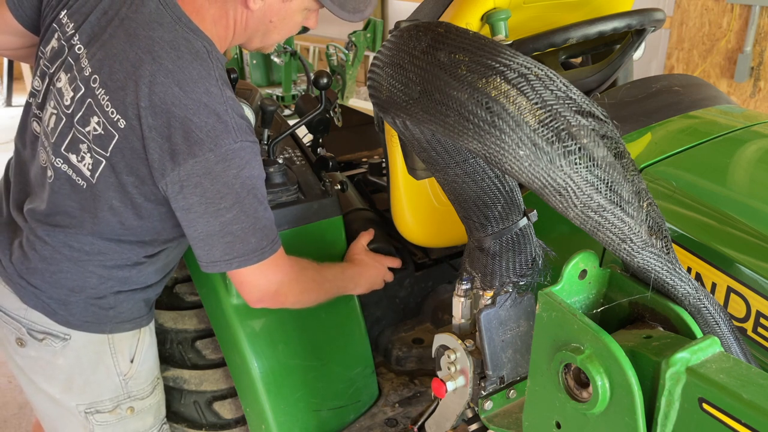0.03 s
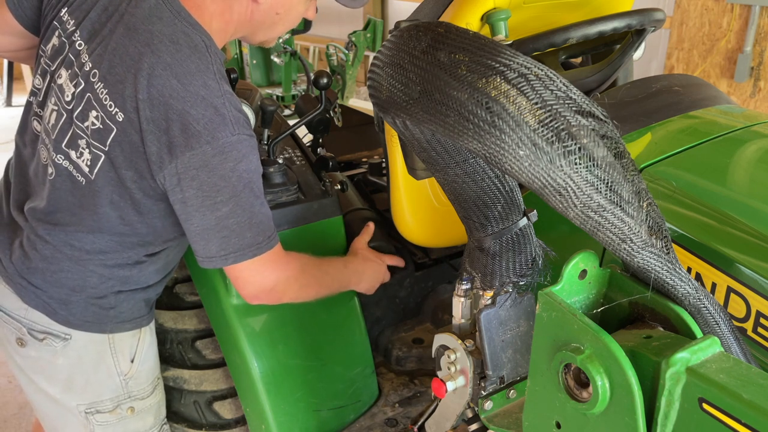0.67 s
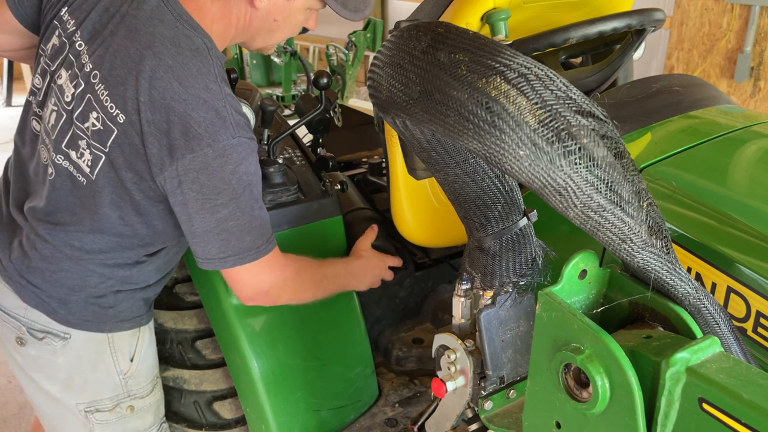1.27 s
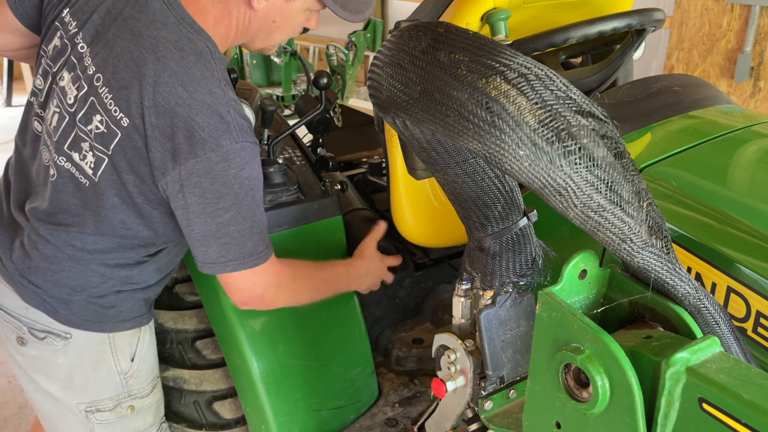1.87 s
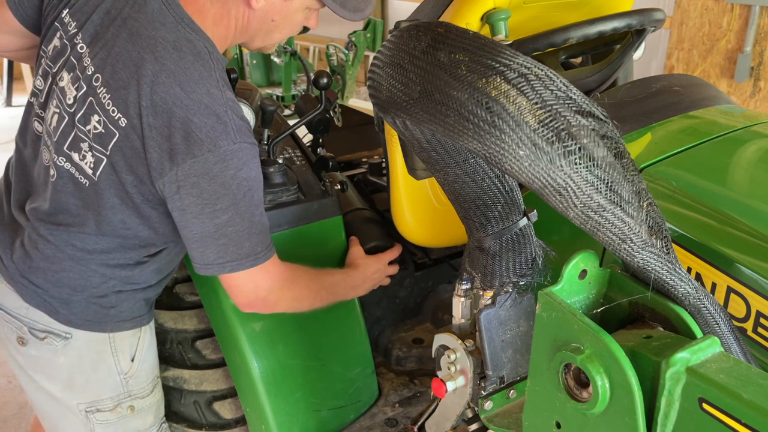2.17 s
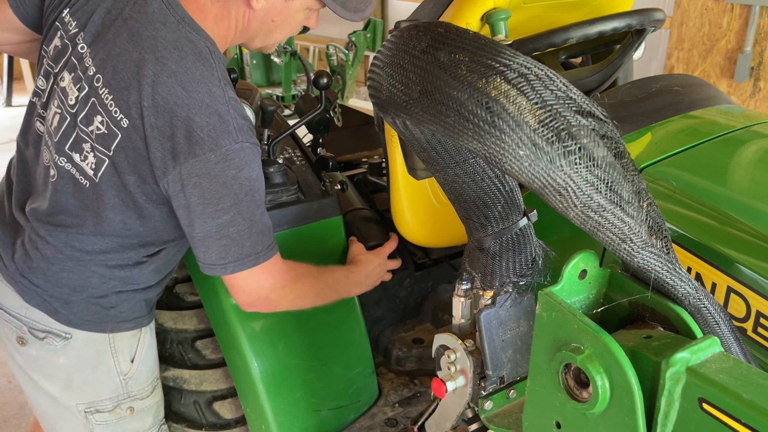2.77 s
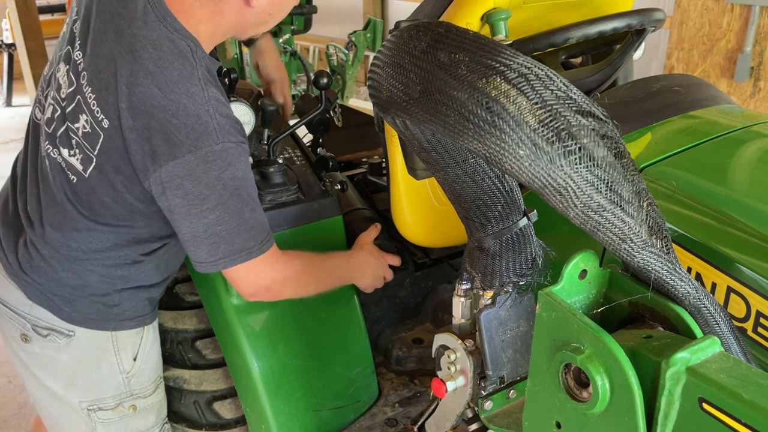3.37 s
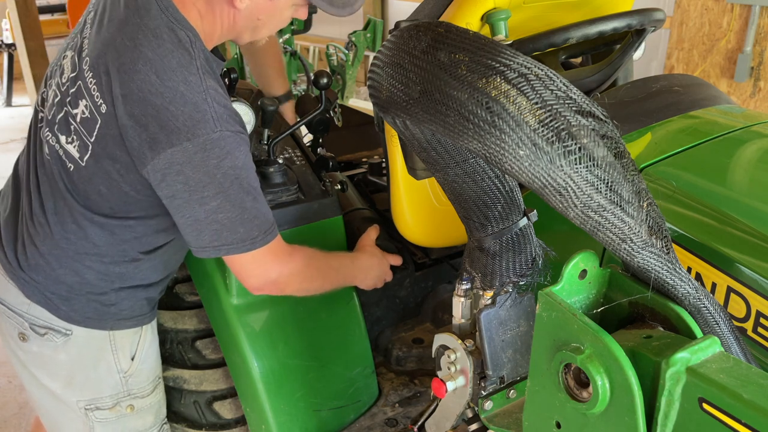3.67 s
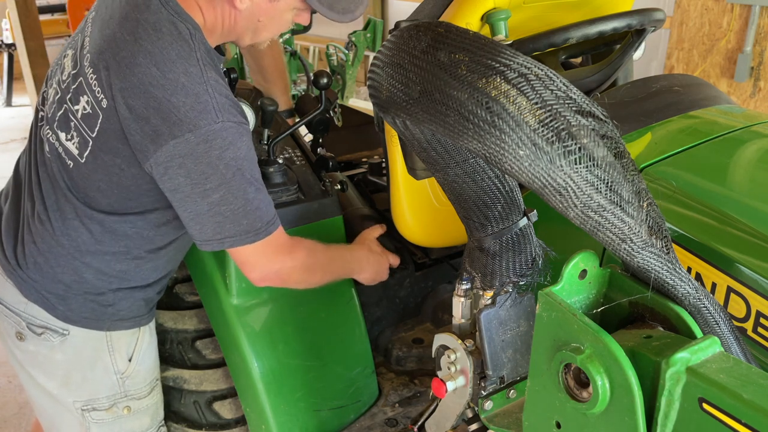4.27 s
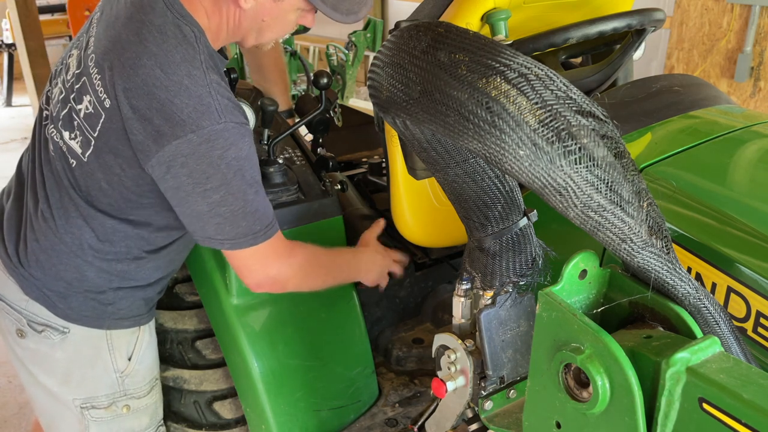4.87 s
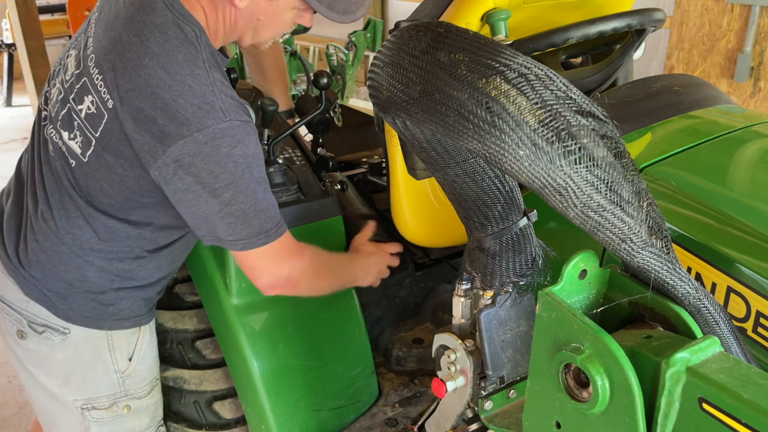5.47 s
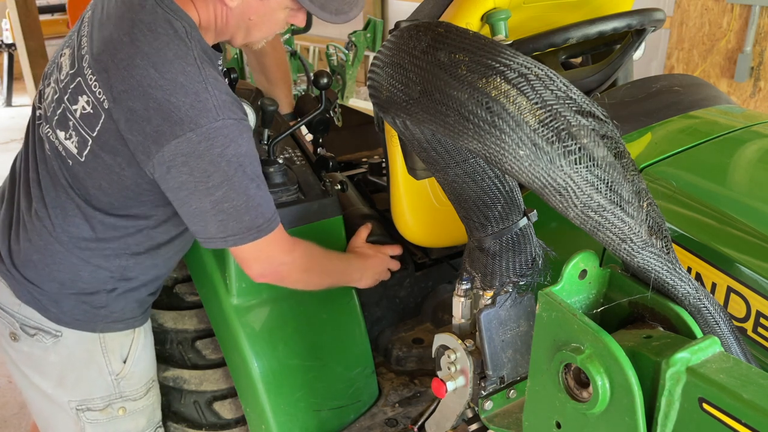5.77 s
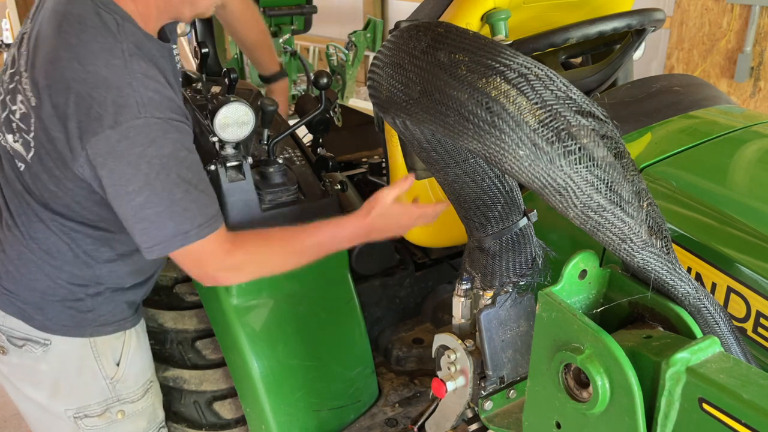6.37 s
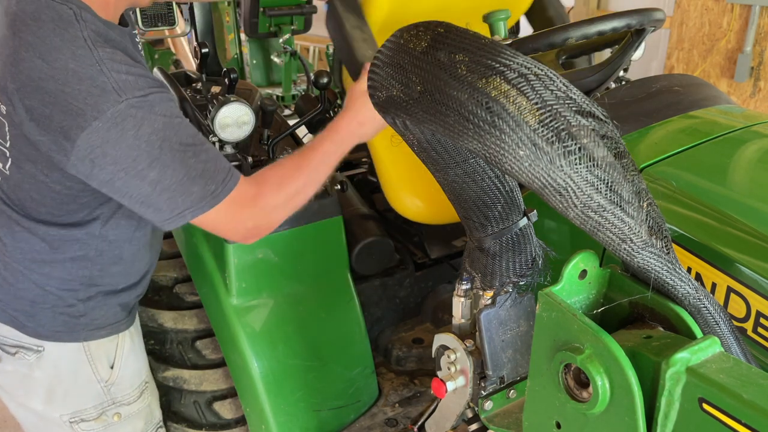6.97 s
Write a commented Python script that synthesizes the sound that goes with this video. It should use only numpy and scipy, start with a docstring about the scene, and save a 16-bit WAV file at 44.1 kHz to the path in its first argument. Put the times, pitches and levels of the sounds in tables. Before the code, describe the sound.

Hands grip and turn a plastic tube on a tractor, with hollow knocks, light rubbing and two sharp snaps midway.

```python
"""A plastic tool tube, mounted on a compact tractor, is gripped and turned by hand in an open shed.
Impacts excite its damped modes as hollow knocks; stick-slip friction makes it rub and rasp.
Midway it snaps loudly, twice. Each blow shakes the tractor's frame, and the shed reverberates.
Air now and then buffets the microphone, over a faint hiss."""
import sys
import numpy as np
from scipy import signal
from scipy.fft import rfft, irfft, next_fast_len
from scipy.io import wavfile
from scipy.ndimage import uniform_filter1d

SR = 44100
rng = np.random.default_rng(int(sys.argv[2]) if len(sys.argv) > 2 else 0)


def to_wav(sig):
    """Store sig (one row per channel, or 1-D mono) as 16-bit WAV at the path in sys.argv[1].

    Samples outside -1..1 are clipped; the rate is SR.
    """
    pcm = np.clip(np.atleast_2d(sig), -1, 1) * 32767
    pcm = np.round(pcm).astype(np.int16)
    wavfile.write(sys.argv[1], SR, pcm.T)  # frames by channels


N = 310239
TIME = np.arange(N) / SR


def from_db(db):
    """Amplitude ratio of a level in decibels."""
    return 10 ** (np.asarray(db) / 20)


def rms(x):
    """Root-mean-square amplitude."""
    return np.sqrt(np.mean(x ** 2) + 1e-20)


def at_hz(rows, hz):
    """Interpolation of a two-column table on a logarithmic frequency axis."""
    freqs, values = np.transpose(rows)
    return np.interp(np.log(np.maximum(hz, 1)), np.log(freqs), values)


def band(x, low, high, order):
    """Causal Butterworth band-pass filtering."""
    return signal.sosfilt(signal.butter(order, [low, high], "band", fs=SR, output="sos"), x)


def add(track, start_s, sound):
    """Linear superposition of a sound on a track."""
    start = max(int(start_s * SR), 0)
    track[:, start:start + sound.shape[1]] += sound[:, :max(N - start, 0)]


# Left-right coherence of the diffuse field: f/Hz, coherence/1
COHERENCE = [(60, .96), (130, .975), (260, .965), (550, .45), (1200, .33), (2500, .38), (5000, .28),
             (10000, .2)]

def diffuse_pair(spectra, hz):
    """Spatial coherence: two independent spectra mix to left and right, most alike at long wavelengths."""
    coherence = at_hz(COHERENCE, hz)
    mid = np.sqrt(1 + coherence) * spectra[0]
    side = np.sqrt(1 - coherence) * spectra[1]
    return np.array([mid + side, mid - side]) / np.sqrt(2)


def coloured_noise(spectrum):
    """Spectral shaping of white noise gives diffuse stereo noise of unit rms."""
    hz = np.fft.rfftfreq(N, 1 / SR)
    white = diffuse_pair(rfft(rng.standard_normal((2, N))), hz)
    noise = irfft(white * from_db(at_hz(spectrum, hz)), N)
    return noise / rms(noise)


# Spectral density of the background hiss: f/Hz, relative level/dB
HISS_SPECTRUM = [(30, -28), (60, -9.5), (102, 1), (200, -14.5), (310, -17), (480, -21), (1000, -26.5),
                 (2400, -28), (4800, -33), (5400, -31), (5570, -26), (5800, -30), (7200, -35.5),
                 (8700, -29.5), (9700, -34.5), (10200, -101)]

def hiss(level_db=-46):
    """Stationary broadband noise forms a faint floor."""
    return from_db(level_db) * coloured_noise(HISS_SPECTRUM)


# Strength of the air against the microphone: t/s, relative level/dB
GUSTS = [(0, -59), (1.8, -62), (2.1, -45), (2.5, -55.5), (3.28, -47.5), (3.58, -29), (3.92, -40.5),
         (4.19, -42), (4.25, -28), (4.36, -42), (4.97, -35.5), (5.2, -47), (5.69, -49.5), (5.75, -33),
         (6.27, -29.5), (6.5, -43.5), (6.91, -55), (7.0, -25)]
# Spectral density of the rumble of air and of frame: f/Hz, relative level/dB
RUMBLE_SPECTRUM = [(20, -11.5), (35, -4.5), (58, 5), (80, 2.5), (110, -10), (170, -29), (400, -63)]

def buffeting(flutter_db=3, eddies_per_s=19, side_db=5.5, trim_db=0.5):
    """Turbulent pressure on the microphone makes a low rumble whose level flutters at random."""
    rumble = coloured_noise(RUMBLE_SPECTRUM)
    mid = rumble.mean(axis=0)
    rumble = mid + from_db(side_db) * (rumble - mid)
    running_power = uniform_filter1d(np.mean(rumble ** 2, axis=0), size=2400)
    eddies = rng.standard_normal(400)
    flutter = np.interp(TIME * eddies_per_s, np.arange(len(eddies)), eddies)
    gust_db = np.interp(TIME, *np.transpose(GUSTS))
    return rumble / np.sqrt(running_power) * from_db(gust_db + flutter_db * flutter + trim_db)


# Normal modes of the tube on its mount: f/Hz, relative level/dB, T60/s
TUBE_MODES = [(107, -5, 0.28), (122.5, -10, 0.334), (154.1, -4, 0.34), (197.2, -1, 0.077),
              (218, -6.5, 0.16), (257.4, -9.5, 0.11), (299.8, -6, 0.16), (326, -15.5, 0.11),
              (390, -3, 0.089), (457.5, -11.5, 0.153), (536, -6.5, 0.082), (595, -10.5, 0.111),
              (666, -10.5, 0.038), (806, -2, 0.024), (901, -14.5, 0.13), (1000, -5.5, 0.024),
              (1110, -3.5, 0.028), (1277, 14, 0.013), (1503, -5, 0.067), (1662, -10, 0.072),
              (2220, -30, .04), (2593, -14.5, 0.054), (2806, -6, 0.039)]

def tube_response(flex_hz, swell_s, ring_db, flex_db, wall_db, wall_t60, snap_db, size):
    """Impulse response: the wall flexes and springs back, its dense modes crack, the hollow rings on."""
    t = TIME[:size]
    hz, level_db, t60 = np.transpose(TUBE_MODES)[:, :, None]
    # modes near the flexing frequency respond most; the place of contact sets the rest by chance
    resonance_db = 3 * np.exp(-(2 * np.log2(hz / flex_hz)) ** 2)
    scatter_db = 1.5 * rng.standard_normal(hz.shape)
    strength = from_db(level_db + resonance_db + scatter_db) * rng.choice([-1, 1], hz.shape)
    modes = np.sum(strength * from_db(ring_db - 60 * t / t60) * np.sin(2 * np.pi * hz * t), axis=0)
    swell = (t / swell_s * np.exp(1 - t / swell_s)) ** 2
    flex = from_db(flex_db) * swell * np.sin(2 * np.pi * flex_hz * t)
    noise = rng.standard_normal(size)
    crack = from_db(-60 * t / wall_t60) * band(noise, 480, 2790, order=1)
    contact_snap = from_db(snap_db - 60 * t / 0.026) * band(noise, 7080, 9200, order=1)
    return modes + flex + from_db(wall_db) * (crack + contact_snap)


def knock_balance(wall_hz, hardness_db, slack_hz=120, stiff_hz=335):
    """Stiffness sets the band levels (dB): slack walls and soft contacts thump, stiff, hard ones clack."""
    thump_db = -9 + 24 * (slack_hz / wall_hz) ** 1.84 - 0.16 * hardness_db
    clack_db = -9.5 + 2 * np.log2(wall_hz / stiff_hz) + 0.52 * hardness_db
    tick_db = -23.5 + hardness_db
    return np.array([thump_db, 0, clack_db, tick_db])


# Blows on the tube: t/s, wall f/Hz, hollow-knock level/dB, contact hardness/dB, preceding slide/s
BLOWS = [(0.031, 414, -15, -10, 0.0044), (0.265, 537, -19, 6, 0.022), (0.514, 387, -18.5, -5.5, .02),
         (0.816, 258, -27, -8.5, 0.0042), (0.828, 216, -28, -23, 0.00029), (0.948, 250, -29, 10.5, 0.056),
         (0.964, 246, -24, -12, 0), (1.351, 385, -13, -5, .018), (2.001, 502.2, -30.5, 14, 0.018),
         (2.019, 302, -24, 11, 0.00017), (3.9882, 1067, -13.5, 24, 0.0053), (3.998, 1610, -10, 25.5, 0),
         (4.002, 121.3, -26.5, -14, 0.0043), (4.226, 536, -12, 20, .012), (4.615, 201.8, -20, -3.5, 0),
         (4.83, 304, -33.5, -7, 0.0076), (4.938, 383, -23, -14.5, 0.011), (5.012, 333, -23.5, -9, 0),
         (5.1, 276, -28.5, -19, 0.0011), (5.417, 372, -15, -2.5, 0.027), (6.017, 203.2, -37, 4, 0),
         (6.089, 114.4, -35.5, 8.5, .05), (6.258, 796, -31, 20, 0), (6.471, 300.4, -40, 22.5, 0.025),
         (6.485, 246, -45, 29.5, 0.0069), (6.527, 284, -36.5, 5.5, 0.011), (6.628, 118, -49, -22, 0),
         (6.795, 120, -35, -11, 0.044), (6.927, 555, -29, -9, 0), (6.995, 710, -20, 1.5, 0.0026),
         (7.022, 694, -19, 2, 0.0067)]
# Bands of thump, hollow knock, clack and tick: lower f/Hz, upper f/Hz
BLOW_BANDS = [(85, 220), (220, 750), (760, 2750), (4400, 11000)]

def knocks():
    """Impact excitation: a soft palm drives mainly the bass; a hard plastic edge adds clack and tick."""
    out = np.zeros((3, N))
    for start_s, wall_hz, level_db, hardness_db, _ in BLOWS:
        blow = tube_response(wall_hz, swell_s=0.00071 + 1.19 / wall_hz, ring_db=1 - 0.13 * hardness_db,
                             flex_db=7.5, wall_db=19.5, wall_t60=0.037, snap_db=-7, size=15000)
        # the plastic yields before it responds in full, more briefly under a hard contact
        yield_s = 0.0014 * from_db(-0.16 * hardness_db)
        blow = blow * (1 - np.exp(-TIME[:len(blow)] / yield_s))
        sound = 0
        for (low, high), balance_db in zip(BLOW_BANDS, knock_balance(wall_hz, hardness_db)):
            part = band(blow, low, high, order=3)
            attack_rms = np.sqrt(uniform_filter1d(part ** 2, SR // 100).max())
            sound = sound + from_db(level_db + balance_db) * part / attack_rms
        add(out, start_s, with_reverberation(sound))
    return out


# Friction bands of groan, rasp and hiss: lower f/Hz, upper f/Hz
FRICTION_BANDS = [(190, 700), (750, 2850), (4600, 9500)]

def stick_slip(strokes, taper, tighten_db, slips_per_s=1800, trim_db=-3.5):
    """Stick-slip friction: sliding plastic catches and releases at random, each slip tapping the tube."""
    out = np.zeros((3, N))
    for start_s, length_s, rasp_db, bright_db in strokes:
        count = int(np.clip(length_s, 0.01, 0.4) * SR)
        chance, size, sign = rng.random((3, SR // 2))[:, :count]
        slips = (chance < slips_per_s / SR) * from_db(-2.5 * np.log(size + 0.01)) * np.sign(sign - 0.5)
        grip = from_db(tighten_db * np.linspace(0, 1, count))
        slips = slips * signal.windows.tukey(count, taper) * grip
        stroke = 0
        for spot in range(2):   # the slips fall on two spots of the tube
            touch = tube_response(flex_hz=347, swell_s=0.0017, ring_db=-2, flex_db=2.5,
                                  wall_db=22.5, wall_t60=0.011, snap_db=-15, size=4000)
            hand_damping = from_db(-250 * TIME[:len(touch)])
            spot_slips = slips * (np.arange(count) % 2 == spot)
            stroke = stroke + signal.fftconvolve(spot_slips, touch * hand_damping)
        groan_db = rasp_db + 7.5 - 0.9 * bright_db   # a dull rub groans more
        hiss_db = rasp_db - 7 + bright_db
        sound = 0
        for (low, high), level_db in zip(FRICTION_BANDS, (groan_db, rasp_db, hiss_db)):
            part = band(stroke, low, high, order=3)
            sound = sound + from_db(level_db + trim_db) * part / rms(part[:count])
        add(out, start_s, with_reverberation(sound))
    return out


def slides(overrun_s=0.0069):
    """Friction grows as the tube gathers speed into a blow; a harder contact is louder and brighter."""
    strokes = []
    for blow_s, _, level_db, hardness_db, slide_s in BLOWS:
        if slide_s > 0:
            rasp_db = level_db - 19 + 0.46 * hardness_db
            bright_db = -4 + 0.3 * hardness_db
            strokes.append((blow_s - slide_s, slide_s + overrun_s, rasp_db, bright_db))
    return stick_slip(strokes, taper=0.3, tighten_db=13.5)


def from_left(x, lag_s=25e-6, treble_pan_db=1.5):
    """Time and level differences: the tube lies a little to the left, so is earlier and brighter there."""
    size = next_fast_len(N + SR, real=True)
    hz = np.fft.rfftfreq(size, 1 / SR)
    phase_lead = np.exp(1j * np.pi * hz * lag_s)
    left = phase_lead * from_db(treble_pan_db * hz / (hz + 2500))
    return irfft(rfft(x, size) * np.array([left, 1 / left]), size)[:, :N]


# Reverberant response of the shed: f/Hz, relative level/dB
SHED_RESPONSE = [(40, 0), (90, -14), (200, -2), (400, -7), (800, -0.5), (1600, -5), (3200, 0.5),
                 (6400, -0.5), (9000, 0.5), (11000, -12)]

def with_reverberation(sound, build_s=0.0038, body_t60=0.61, treble_t60=0.33, crossover_hz=4000):
    """Diffuse reflections decay exponentially, the treble sooner. Rows: direct, left echo, right echo."""
    size = 2 ** 15
    t, hz = TIME[:size], np.fft.rfftfreq(size, 1 / SR)
    paths = rng.standard_normal((2, size)) * (1 - np.exp(-t / build_s))
    body, treble = [paths * from_db(-60 * t / t60) for t60 in (body_t60, treble_t60)]
    treble_share = hz ** 2 / (hz ** 2 + crossover_hz ** 2)
    tails = (rfft(body) * (1 - treble_share) + rfft(treble) * treble_share) / (rms(body) * np.sqrt(size))
    room = diffuse_pair(tails, hz) * from_db(at_hz(SHED_RESPONSE, hz))
    echo = irfft(rfft(sound, size) * room, size)
    return np.vstack([np.pad(sound, (0, size - len(sound))), echo])


def frame_shudder(rise_s=0.033, t60=0.55, coupling_db=-20):
    """Structure-borne vibration: each blow sets the tractor's frame rumbling for a moment."""
    t = TIME[:SR // 2]
    swell = (1 - np.exp(-t / rise_s)) * from_db(coupling_db - 60 * t / t60)
    envelope = np.zeros((1, N))
    for start_s, _, level_db, _, _ in BLOWS:
        add(envelope, start_s, from_db(level_db) * swell[None])
    return envelope * coloured_noise(RUMBLE_SPECTRUM).mean(axis=0)


# Plastic sliding under the hands: t/s, duration/s, relative rasp level/dB, brightness/dB
HAND_STROKES = [(1.484, 0.026, -42.5, 0), (1.62, 0.033, -40.5, 0.5), (1.679, 0.031, -39, -1),
                (2.061, 0.085, -42, 0), (2.196, 0.021, -38.5, -0.5), (2.57, 0.045, -53.5, -4),
                (2.778, 0.072, -53.5, 3), (3.423, 0.19, -55, 6.5), (3.536, 0.06, -47, 4),
                (3.768, 0.11, -53.5, 7), (4.562, 0.041, -43, -9), (4.667, .1, -38.5, 2.5),
                (4.984, .06, -34.5, 0.5), (5.264, 0.088, -44, -1.5), (6.128, .13, -47.5, 0),
                (6.869, 0.0665, -53.5, -14), (6.926, 0.04, -36.5, -5), (6.984, 0.14, -36, -4)]

def rubs():
    """Sliding friction under nearly even pressure, as the hands turn the tube."""
    return stick_slip(HAND_STROKES, taper=0.21, tighten_db=-1.5)


def scene():
    """Superposition of the tube's direct sound, the shed's echo, the shaken frame, the air and the hiss."""
    tube = knocks() + slides() + rubs()
    direct, echo = tube[0], tube[1:]
    return from_left(direct) + echo + frame_shudder() + buffeting() + hiss()


def record(dry, cutoff_hz=11283):
    """Saturation rounds off the loudest snaps; a steep low-pass filter limits the bandwidth."""
    clipped = dry / (1 + dry ** 6) ** (1 / 6)
    low_pass = signal.ellip(10, 0.2, 80, cutoff_hz, fs=SR, output="sos")
    return signal.sosfilt(low_pass, clipped)


dry = scene()
out = record(dry)
to_wav(out)
```